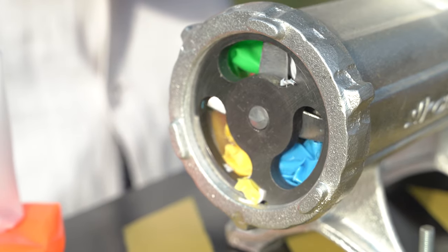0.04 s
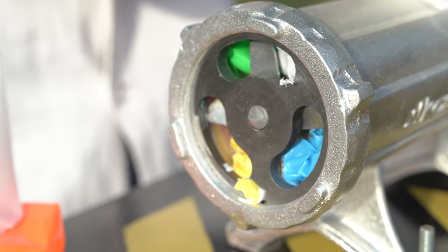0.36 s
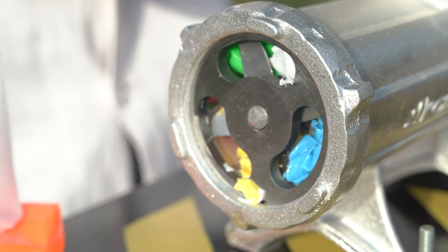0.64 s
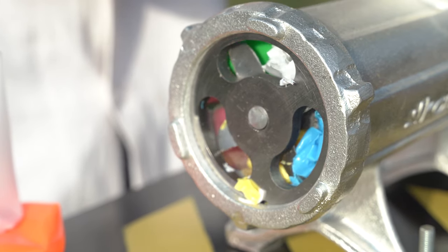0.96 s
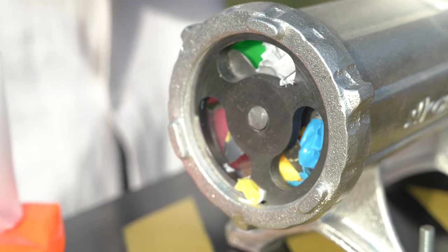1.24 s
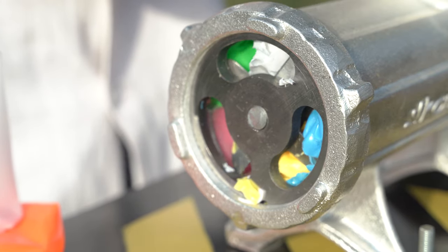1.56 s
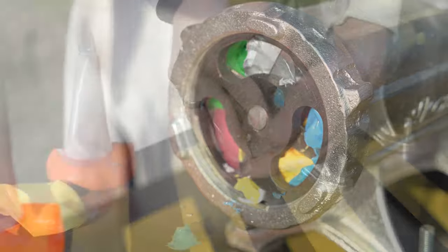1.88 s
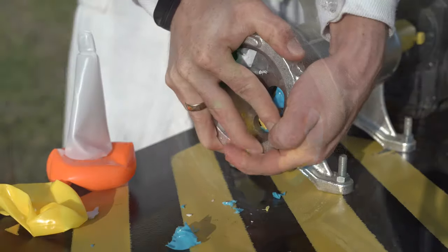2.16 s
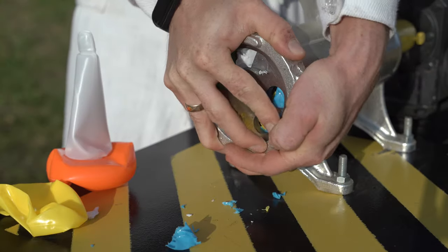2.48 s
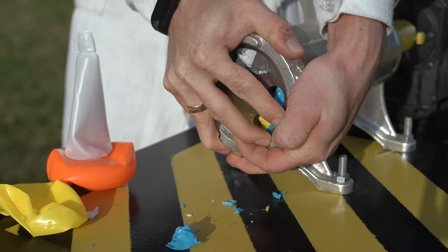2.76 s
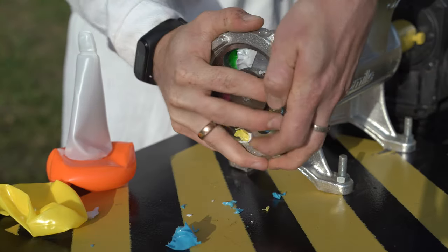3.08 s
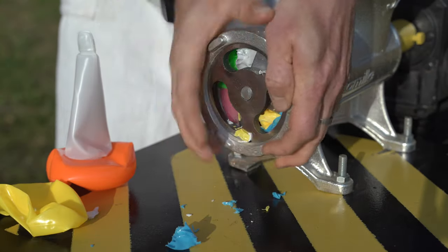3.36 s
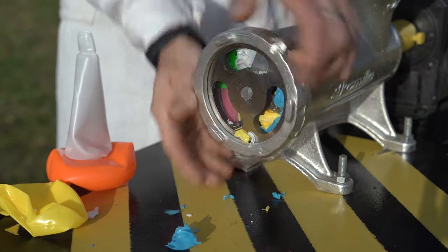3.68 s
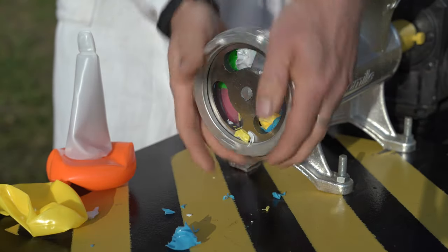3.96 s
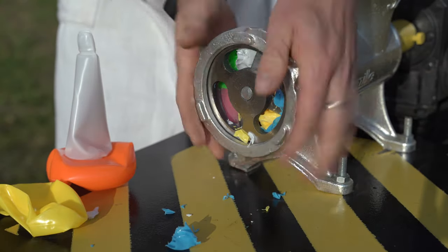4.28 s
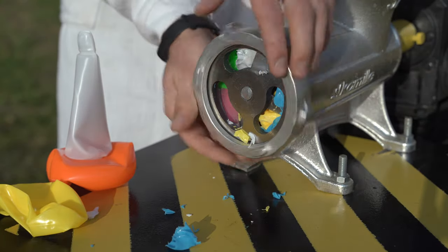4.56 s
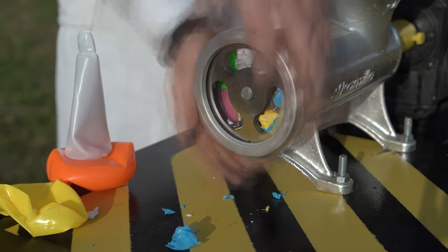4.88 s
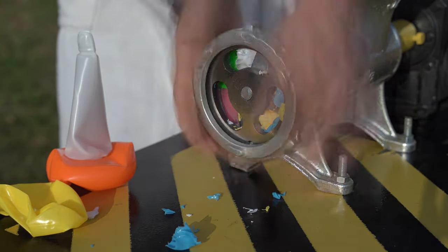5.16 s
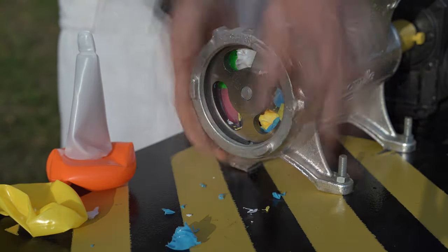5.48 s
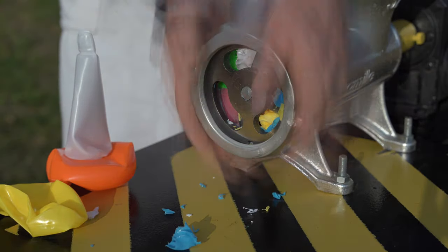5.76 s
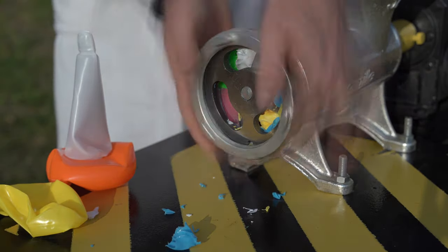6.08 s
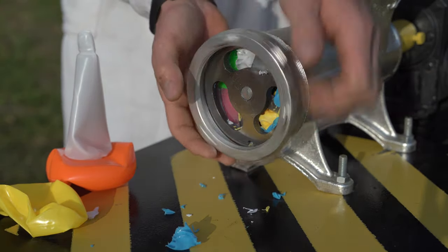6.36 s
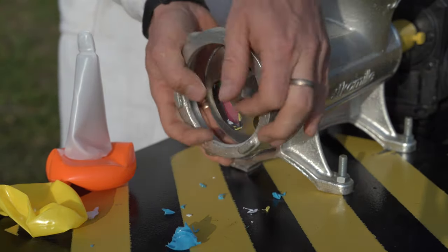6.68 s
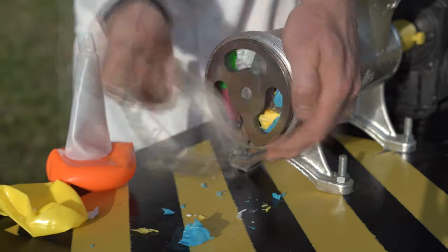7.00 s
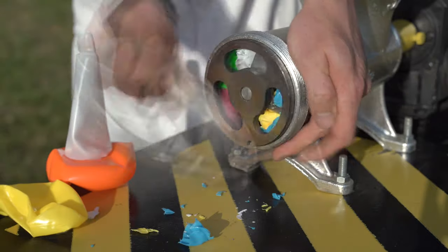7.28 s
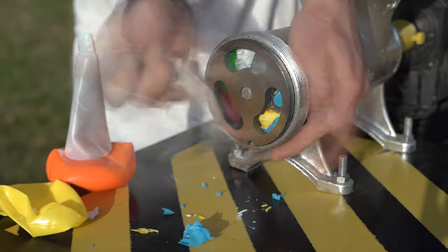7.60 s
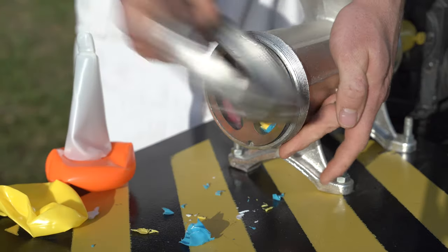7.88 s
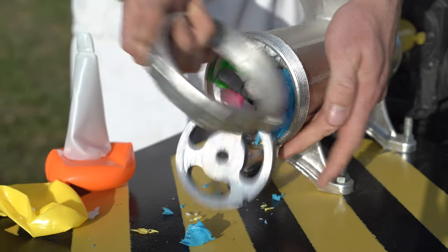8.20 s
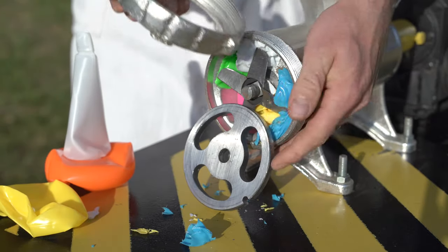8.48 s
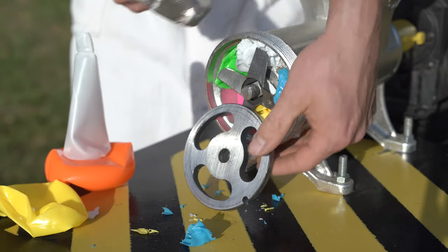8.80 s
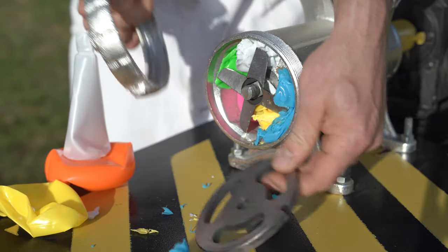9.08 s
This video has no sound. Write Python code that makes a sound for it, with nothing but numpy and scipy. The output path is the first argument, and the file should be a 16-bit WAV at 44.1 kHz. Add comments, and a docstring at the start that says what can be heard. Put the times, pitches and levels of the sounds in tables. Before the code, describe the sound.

A motorized grinder chews plastic and winds down; a threaded metal ring scrapes and rattles loose before a steel disc drops, ringing.

```python
"""An electric meat grinder chews plastic toys, outdoors on a steel table: gear teeth rattle the housing,
the auger scrapes, plastic snaps, and the drive fades out. Hands unscrew the cast retaining ring, which
rubs and rattles in its thread and knocks on the barrel. The steel cutting plate springs free, bounces
and rings on the table, and is picked up among plastic crumbs. Gusts rumble at the microphone."""
import sys
import numpy as np
from scipy import signal
from scipy.fft import rfft, irfft, next_fast_len
from scipy.io import wavfile
from scipy.ndimage import uniform_filter1d

SR = 44100
rng = np.random.default_rng(int(sys.argv[2]) if len(sys.argv) > 2 else 0)


def output_pcm(signal):
    """Save a mono or channel-first signal as 16-bit PCM at the path in sys.argv[1].

    Samples are clipped to [-1, 1] before scaling.
    """
    pcm = np.clip(np.atleast_2d(signal).T, -1, 1) * 32767
    wavfile.write(sys.argv[1], SR, np.round(pcm).astype(np.int16))


N = 407484
TIME = np.arange(N) / SR
AGE = np.arange(int(.8 * SR)) / SR  # s since an event began
SHAFT_HZ, MESH_HZ = 17.3, 80.8


# drive envelope: time_s, level_db
DRIVE_LEVEL = [(0, -28.5), (1.2, -28), (1.68, -29.5), (1.95, -35.5), (2.15, -48), (2.3, -68), (2.42, -114)]
# gear housing resonances: freq_hz, width_hz, gain_db
GEARBOX_RESONANCES = [(488, 83, 2), (552, 36, -3), (636, 18, -2.5), (698, 21, -5), (869, 17.5, -1),
                      (912, 21, -11), (1089, 51, -1.5), (1126, 30, -3), (1459, 54, -6), (1684, 24, -6.5),
                      (1822, 31, -6.5), (2070, 57, -14.5)]
# casing noise: freq_hz, level_db
CASING_SPECTRUM = [(30, -1.5), (40, -30.5), (55, -8.5), (120, -7.5), (170, -16), (255, -27), (340, -12.5),
                   (600, -10.5), (770, -11.5), (1000, -6), (1200, -6.5), (1350, -19), (1900, -18.5),
                   (2400, -32), (3500, -38.5)]

def grinder():
    """Gear teeth rattle housing and casing, pulsing with shaft and mesh; auger and motor join in."""
    clock = TIME + np.cumsum(.007 * walk(5)) / SR  # speed wander
    shaft = np.cos(2 * np.pi * SHAFT_HZ * clock)
    mesh = np.cos(2 * np.pi * MESH_HZ * clock)
    load = undb(.9 * shaft + 3.4 * mesh + .6 * walk(25))
    teeth = shaft_impacts(clock, spread_db=2.4, repeat=.45) * load
    housing = undb(-8) * sing(teeth, GEARBOX_RESONANCES)
    casing = undb(-6.5) * colour(grains(1.67) * load, CASING_SPECTRUM)
    drive = curve(DRIVE_LEVEL)
    running = drive / drive.max()
    scraping = undb(-27.5) * auger(clock, shaft) * running ** .68  # fades ahead of the gears
    return drive * (housing + casing + scraping) + undb(-3) * motor_hum() * running + gear_whine()


# auger scrape: freq_hz, level_db
AUGER_SPECTRUM = [(1410, -27), (2400, -16.5), (3370, -7), (5060, -8), (5480, -16), (5950, -16.5),
                  (9820, -23), (14000, -51)]
# barrel resonances: freq_hz, width_hz, gain_db
BARREL_RESONANCES = [(2490, 49, 2), (2655, 68, -2), (3265, 120, -1.5), (3520, 42, 3.5), (3967, 180, -4),
                     (4520, 57, -9), (5150, 70, -12)]

def auger(clock, shaft):
    """The auger scrapes the barrel and excites its narrow modes, biting harder once a turn."""
    scrape = shaft_impacts(clock, spread_db=3.2, repeat=.35) * undb(1.3 * walk(9))
    modes = unit(signal.oaconvolve(scrape, clink(AUGER_SPECTRUM, t60=.06, count=90))[:N])
    hiss = colour(scrape, AUGER_SPECTRUM)
    barrel = sing(scrape, BARREL_RESONANCES)
    bite = undb(2.7 * shaft + 1.8 * walk(200))
    return (undb(-5) * modes + undb(-8.5) * hiss + undb(-2.5) * barrel) * bite


# motor and gear lines: pitch_hz, level_db
HUM_LINES = [(100, -43), (200, -50.5), (300, -54.5), (885, -40)]

def motor_hum():
    """Motor and gear tones, each wavering in level and phase."""
    return sum(undb(db + 3.6 * walk(3.9)) * np.sin(2 * np.pi * hz * (TIME + .0001 * walk(6.7)))
               for hz, db in HUM_LINES)


# gear whine: time_s, pitch_hz, level_db
WHINE_TRACK = [(0, 492, -63.5), (.8, 497, -34), (1.35, 498.7, -46), (1.55, 481, -29), (1.75, 436.6, -39.5),
               (2.05, 455, -46), (2.28, 450, -58.5), (2.42, 457, -86)]

def gear_whine():
    """A rough gear tone that sags as the load grows."""
    times, hz, _ = np.transpose(WHINE_TRACK)
    pitch_hz = np.interp(TIME, times, hz) * (1 + .026 * walk(70))
    level = curve(WHINE_TRACK, column=2) * undb(3.5 * walk(55))
    return level * np.sin(2 * np.pi * np.cumsum(pitch_hz) / SR)


# plastic snaps: start_s, level_db, centre_hz
PLASTIC_SNAPS = [(.763, -13, 2750), (1.125, -24.5, 6600), (1.744, -25, 2400), (2.197, -49, 10500),
                 (8.047, -22, 2780), (8.167, -27, 3000), (9.054, -40, 7140), (9.066, -30.5, 4660),
                 (9.098, -43, 6800), (9.124, -38, 7600)]
# one snap: centre_ratio, level_db
SNAP_SPECTRUM = [(.6, -12), (.92, 1), (1.45, -5), (2, -21), (4, -21)]

def plastic():
    """Brittle plastic snaps in the barrel and under the plate, each time one brief, broad resonance."""
    out = np.zeros(N)
    for start_s, db, centre_hz in PLASTIC_SNAPS:
        spectrum = [(centre_hz * ratio, band_db) for ratio, band_db in SNAP_SPECTRUM]
        add(out, start_s, undb(db) * burst(spectrum, t60=.0078, rise_s=.00084))
    return out


# ring on barrel: start_s, level_db, hardness_db, ringing_db, choke_after_s
RING_KNOCKS = [(3.41, -36.5, 8, -22, 0.0014), (3.617, -41, 0.5, -46, 0.0044),
               (3.725, -36, -12.5, -36, 0.036), (3.815, -55.5, -38.5, -63, .02),
               (3.971, -35.5, 12, -43.5, 0.003), (3.985, -39.5, -27.5, -51.5, 0.033),
               (4.027, -39, -15, -55.5, .02), (4.115, -32, -1, -47, 0.04),
               (4.393, -35.5, 10.5, -48.5, 0.0024), (4.766, -36.5, -8, -56, .012),
               (5.89, -38.5, -4, -35, 0.0035), (6.198, -36.5, 10.5, -49, 0.011),
               (6.221, -32.5, -20, -35, 0.011), (6.323, -35.5, -27, -31, 0.0092),
               (6.389, -35.5, 0.5, -31.5, 0.033), (6.474, -18, -11, -12.5, 0.044),
               (6.535, -37.5, 19.5, -43.5, 0.0072), (6.602, -20, -2.5, -23, 0.0035),
               (6.617, -27.5, 3.5, -45, 0.016), (6.67, -27.5, -5, -29.5, 0.0102),
               (7.714, -15, -2.5, -29.5, 0.018), (7.743, -24.5, 0, -51.5, 0.0073)]
# retaining ring modes: freq_hz, level_db, t60_s
RING_MODES = [(1288, -12.5, 0.13), (1950, -22.5, 0.05), (2202, -21, .18), (3400, -8, .15), (3544, -2, 0.25),
              (5950, -19, 0.11), (7063, -25.5, 0.2), (9140, -23, .06), (11500, -22, .06)]
# low body of a blow: freq_hz, level_db
THUD_SPECTRUM = [(90, -6.5), (155, 3), (250, -12), (340, 4), (480, 7), (750, 3), (1100, -6), (1500, -6.5)]

def ring_knocks():
    """The ring hits the barrel: harder contact, more tick, less thud. The hand chokes the ringing."""
    out = np.zeros(N)
    for start_s, db, hard_db, ringing_db, choke_after_s in RING_KNOCKS:
        add(out, start_s, undb(db + hard_db - 5) * tick(t60=.037, tail_db=-2))
        add(out, start_s, undb(db) * clack(t60=.04, rise_s=.00054, clink_t60=.042))
        add(out, start_s, undb(db - .51 * hard_db - 3) * burst(THUD_SPECTRUM, t60=.11, rise_s=.00083))
        choke = hold(choke_after_s, release_s=.007)
        add(out, start_s, undb(ringing_db - 4) * strike(RING_MODES, scatter_db=3) * choke)
    return out


TAP_GAP_S = .017
# flicks that spin the ring: start_s, first_tap_db, second_tap_db
RING_FLICKS = [(4.809, -35, -48), (4.91, -37, -50), (5.017, -41, -39), (5.125, -39, -29), (5.363, -30, -49),
               (5.468, -31, -32), (5.662, -30.5, -37), (5.748, -34, -36.5), (5.823, -39, -34),
               (5.904, -54, -34.5), (5.992, -48.5, -40.5), (6.072, -40.5, -28), (6.168, -30, -42.5),
               (6.929, -39, -28), (6.9786, -25.5, -28.5), (7.019, -22, -23.5), (7.0612, -24.5, -22.5),
               (7.115, -28.5, -18.5), (7.165, -22.5, -20.5), (7.21, -23.5, -18.5), (7.2623, -25.5, -20.5),
               (7.318, -16.5, -27.5), (7.357, -24.5, -20.5), (7.403, -35, -16.5), (7.4493, -24, -20),
               (7.501, -18, -27), (7.545, -18, -28.5), (7.588, -18.5, -26), (7.637, -16.5, -30),
               (7.677, -49, -15), (7.788, -25.5, -29.5)]

def ring_rattles():
    """Each flick makes the ring tap twice in the play of its thread; the table drones along."""
    out = np.zeros(N)
    for start_s, first_db, second_db in RING_FLICKS:
        for tap_s, db in ((start_s, first_db), (start_s + TAP_GAP_S, second_db)):
            body_db = tap_body_db(db)
            add(out, tap_s, undb(db - 8) * tick(t60=.014, tail_db=0))
            add(out, tap_s, undb(body_db - 8.5) * clack(t60=.013, rise_s=.00042, clink_t60=.031))
            add(out, tap_s, undb(body_db - 10) * burst(THUD_SPECTRUM, t60=.055, rise_s=.0095))
            add(out, tap_s, undb(body_db - 21) * strike(TABLE_MODES, scatter_db=2))
    return out


def tap_body_db(tap_db, firm_db=-15):
    """Light taps only tick; firm ones move the whole casting."""
    return firm_db + 1.38 * (tap_db - firm_db)


# ring turns, last the plate sliding off its pin: start_s, length_s, rub_db, swell_db, grit_db, sing_db
STROKES = [(2.919, 0.14, -46, 1.5, -50, -55.5), (3.435, 0.33, -41.5, 15, -53, -57.5),
           (4.003, 0.23, -43.5, -11, -52.5, -66), (4.111, 0.076, -39.5, -33, -55, -46),
           (4.378, 0.3, -43.5, 3, -52, -56.5), (4.582, 0.16, -51, 11, -68, -79),
           (4.964, 0.027, -40.5, 20, -41.5, -46.5), (5.235, 0.075, -40, 2, -49, -48.5),
           (5.57, 0.069, -43.5, 6, -56, -58), (5.845, 0.036, -54, 4, -72, -74),
           (6.111, 0.048, -39.5, -3, -36.5, -51), (6.197, 0.25, -33.5, 10.5, -54.5, -57.5),
           (6.318, 0.22, -55.5, -0.5, -48, -47), (6.546, 0.091, -22, -9.5, -35.5, -35.5),
           (6.622, 0.039, -48.5, -3, -56.5, -72), (6.747, 0.052, -44.5, 7, -71, -66),
           (7.056, 0.8, -54.5, 10.5, -75, -55.5), (7.966, 0.14, -43.5, -31.5, -44.5, -61.5)]
# thread rub: freq_hz, level_db
RUB_SPECTRUM = [(100, -5.5), (155, 15.5), (200, -13), (250, -16), (340, 11), (560, 4), (790, -3.5),
                (900, -0.5), (1300, -10.5), (1900, -13.5), (2600, -18), (3000, -28)]
# thread grit: freq_hz, level_db
GRIT_SPECTRUM = [(2000, -10), (3000, 0.5), (3500, 6.5), (4100, 3), (4700, -6), (5600, -12.5), (6200, -2.5),
                 (7600, -15), (9300, -8.5), (12000, -19), (16000, -23.5)]
# rubbed ring resonances: freq_hz, width_hz, gain_db
RUB_RESONANCES = [(1264, 38, -2.5), (1650, 190, -8.5), (2210, 24, -4), (2490, 90, -9), (3590, 96, -9),
                  (4030, 98, -10)]

def thread_friction():
    """Metal grinds on metal in strokes; a flick lifts the ring, drags it and may let it slide on."""
    rub_env, grit_env, sing_env, spin_env = np.zeros((4, N))
    contact = np.ones(N)
    delay_s, max_slide_s, lift_s = .016, .051, .022
    flicks_s = [row[0] for row in RING_FLICKS]
    slides = [(start_s + delay_s, min(gap_s - delay_s, max_slide_s), -42, 0, -58, -56)  # as STROKES
              for start_s, gap_s in zip(flicks_s, np.diff(flicks_s)) if gap_s > .06]
    for start_s, length_s, rub_db, swell_db, grit_db, sing_db in STROKES + slides:
        swell, arch = stroke(length_s, swell_db)
        add(rub_env, start_s, undb(rub_db) * swell)
        add(grit_env, start_s, undb(grit_db) * arch)
        add(sing_env, start_s, undb(sing_db) * swell)
    for start_s, length_s, *_ in slides:
        add(spin_env, start_s, undb(-65) * stroke(length_s, swell_db=0)[0])
    drag = hold(TAP_GAP_S, release_s=.0045)
    for start_s, first_db, second_db in RING_FLICKS:
        db = tap_body_db((first_db + second_db) / 2)
        add(rub_env, start_s, undb(db - 6.5) * drag)
        add(grit_env, start_s, undb(db - 16) * drag)
        contact[int((start_s - lift_s) * SR):int(start_s * SR)] = undb(-2.5)
    pressure = uniform_filter1d(contact, size=200) * undb(2 * walk(80))
    body = moving_contact(grains(4.5), t60=.09)
    grit = moving_contact(grains(5.2), t60=.06)
    rub = undb(-1.5) * colour(body * pressure, RUB_SPECTRUM) * rub_env
    scratch = undb(-2) * colour(grit * pressure, GRIT_SPECTRUM) * grit_env
    singing = sing(grit * pressure, RUB_RESONANCES) * sing_env
    free_spin = sing(grit, [(6400, 380, 0)]) * spin_env
    return rub + scratch + singing + free_spin


def stroke(length_s, swell_db):
    """Rub and grit envelopes of one slide; both follow the speed, which peaks in mid-stroke."""
    done = np.minimum(AGE / length_s, 1)
    after = np.maximum(AGE / length_s - 1, 0)
    speed = np.abs(np.sin(np.pi * done))
    gate = (1 - np.exp(-done / .1)) * np.exp(-after / .12)
    return gate * undb(swell_db * (done - .5) - 5 * (1.5 - speed)), speed ** 1.6


def moving_contact(x, t60, shift_s=.11):
    """As the contact point travels, one set of crowded cast-metal modes fades into the next."""
    modes, hop = np.zeros(N), int(shift_s * SR)
    fade = np.sqrt(np.hanning(2 * hop))
    age = AGE[:len(AGE) // 8]
    for start in range(int(STROKES[0][0] * SR) - hop, int(STROKES[-1][0] * SR) + hop, hop):
        response = unit(rng.standard_normal(len(age)) * decay(age, t60))
        add(modes, start / SR, fade * signal.fftconvolve(x[start:start + 2 * hop], response)[:2 * hop])
    return unit(x) + 2.2 * colour(modes, [(300, -20), (1400, 0), (16000, 0)])  # hands damp the lows


# ring, barrel and rattling plate resonances (3277 Hz is the plate's bending): freq_hz, width_hz, gain_db
RATTLE_RESONANCES = [(1180, 27, 11), (1665, 120, 2.5), (3277, 57, 5), (5880, 54, 7.5), (6050, 60, 12),
                     (8910, 150, 12), (10360, 60, 4.5)]

def metal_colour(x, depth_db):
    """Narrow resonances of the ring, the barrel and the rattling plate colour a sound; rms unchanged."""
    resonant = sum(undb(db) * resonate(x, hz, width_hz) for hz, width_hz, db in RATTLE_RESONANCES)
    return unit(x + undb(depth_db) * resonant) * np.sqrt(np.mean(x ** 2))


# plate falls, settles, is picked up: start_s, level_db, hardness_db, table_db, bend_db, rim_db, foot_db
PLATE_CONTACTS = [(8.122, -22.5, -8, -11.5, -40.5, -45, -28), (8.244, -15.5, -5, -42, -48, -57, -18.5),
                  (8.28, -20.5, -12, -16, -58, -57, -47), (8.312, -22, -4.5, -23, -17.5, -44, -46),
                  (8.354, -21.5, -10, -19.5, -37, -42, -42), (8.396, -31, -8, -28.5, -44, -52, -55),
                  (8.467, -44.5, -26.5, -57, -67.5, -83, -68), (8.517, -24.5, -27, -56, -64, -67, -28.5),
                  (8.984, -46.5, -30, -49, -39, -83, -49), (9.01, -41, -32, -65, -55, -74, -48.5),
                  (9.123, -53, -20, -49, -64.5, -74, -79)]
# plate bending modes: freq_hz, level_db, t60_s
BENDING_MODES = [(3275, -3.5, 0.99), (3370, -4, 0.28), (4220, -1, 0.44), (4900, -29.5, 0.7),
                 (7255, -5.5, 0.34), (10400, -28.5, 0.2), (15570, -32.5, .25)]
# plate rim modes: freq_hz, level_db, t60_s
RIM_MODES = [(8710, 1, 0.38), (8850, 4.5, 0.43), (9249, -16, .45), (9895, -19, .3), (10190, -12, 0.35),
             (12750, -6, .42), (13150, -3, .5), (14200, -17, .35)]
# steel table modes: freq_hz, level_db, t60_s
TABLE_MODES = [(108.5, -4, 0.15), (148.5, 0, 0.29), (263, 2, 0.061), (331, 4, 0.12), (510, 0.5, 0.067),
               (652, -13, 0.17), (814, -14.5, 0.072), (984, -20.5, 0.072)]
# modes of the grinder's cast foot: freq_hz, level_db, t60_s
FOOT_MODES = [(576, -1.5, 0.18), (1040, -15, 0.33), (1136, 2.5, 0.074), (1603, -5.5, .086),
              (2030, -3.5, 0.098), (3300, -8.5, 0.07), (6150, -12, 0.032)]

def cutting_plate():
    """The disc pops free and sings; each landing cracks, booms in the table, damps and restrikes it."""
    out, bending, rim = np.zeros((3, N))
    pop_s, rest_s, full_landing_db, tilt_db_per_octave = 7.972, 8.467, -10.5, -22
    high_modes = [mode for mode in RING_MODES if mode[0] > 3000]  # short contact reaches only these
    # the pop bends the rim more slowly than a landing does
    dull_rim = [(hz, db + tilt_db_per_octave * np.log2(hz / RIM_MODES[0][0]), t60)
                for hz, db, t60 in RIM_MODES]
    add(out, pop_s, crack(db=-8.5, hard_db=2))
    add(out, pop_s, undb(-2.5) * strike(high_modes) * np.exp(-AGE / .0066))
    add(bending, pop_s, undb(-33.5) * strike(BENDING_MODES))
    add(rim, pop_s, undb(-25) * strike(dull_rim))
    for start_s, db, hard_db, table_db, bend_db, rim_db, foot_db in PLATE_CONTACTS:
        add(out, start_s, crack(db, hard_db))
        add(out, start_s, undb(table_db) * strike(TABLE_MODES))
        add(out, start_s, undb(foot_db) * strike(FOOT_MODES))
        flex = undb(bend_db - 5.5) * strike(BENDING_MODES)
        shimmer = undb(rim_db) * strike(RIM_MODES)
        if start_s < rest_s:
            force = min(undb(db - full_landing_db), 1)
            bending *= damp(start_s, db=-16 * force)
            rim *= damp(start_s, db=-16.5 * force)
            add(bending, start_s, flex)
            add(rim, start_s, shimmer)
        else:  # leaning on the barrel or held: rings only briefly
            add(out, start_s, (flex + shimmer) * np.exp(-AGE / .054))
    rocking = undb(3 * walk(45))  # the face turns to and from the microphone
    return out + (bending * damp(rest_s, db=-48) + rim) * rocking


def crack(db, hard_db):
    """One plate contact: tick, clack and, when it lands flat and soft, a thud."""
    return (undb(db + hard_db - .5) * tick(t60=.035, tail_db=-5)
            + undb(db - 3.5) * clack(t60=.038, rise_s=.00019, clink_t60=.042, clink_db=-2.5)
            + undb(db + 9.5 - 2 * max(hard_db + 8, 0)) * burst(THUD_SPECTRUM, t60=.075, rise_s=.0018))


# midrange of a blow: freq_hz, level_db
CLACK_SPECTRUM = [(800, -16), (1150, 2), (1600, -0.5), (2000, 5.5), (2950, 2.5), (3300, 1.5), (3700, 10),
                  (4350, 2.5), (4900, -29), (5600, -40.5)]

def clack(t60, rise_s, clink_t60, clink_db=0):
    """Struck metal: a dense midrange burst and a few distinct modes."""
    return burst(CLACK_SPECTRUM, t60, rise_s) + undb(clink_db) * clink(CLACK_SPECTRUM, clink_t60)


# treble of a blow: freq_hz, level_db
TICK_SPECTRUM = [(4300, 7.5), (5400, 1.5), (6100, 9.5), (6900, 2), (8900, -3.5), (11800, 1.5),
                 (16000, -13.5)]

def tick(t60, tail_db):
    """Steel on steel: a very short spike, then brief high modes."""
    spike = burst(TICK_SPECTRUM, t60=.0046, rise_s=.00021)
    tail = clink(TICK_SPECTRUM, t60) + undb(-3.5) * burst(TICK_SPECTRUM, t60, rise_s=.0005)
    return spike + undb(tail_db) * tail


def reflections(x, wet_db, t60):
    """Adds weak, dull scatter from the machine and things nearby."""
    spectrum = [(120, 12), (1200, -7), (4000, -.5), (15000, -14)]
    tail = colour(rng.standard_normal(len(AGE)), spectrum) * decay(AGE, t60)
    return x + undb(wet_db) * signal.fftconvolve(x, tail / np.sqrt(np.sum(tail ** 2)))[:N]


# gust envelope: time_s, level_db
GUST_LEVEL = [(0.0, -41.5), (1.75, -46.5), (2.83, -63), (2.96, -41), (3.27, -64), (3.45, -55),
              (4.92, -50.5), (5.22, -32.5), (5.6, -45), (5.94, -52.5), (6.6, -37), (6.85, -33),
              (7.05, -36.5), (7.5, -38), (8.36, -35), (8.67, -50), (9.24, -48.5)]
# wind rumble: freq_hz, level_db
RUMBLE_SPECTRUM = [(15, -10), (28, -0.5), (42, 3.5), (62, -8), (90, -17.5), (150, -26.5), (300, -56)]
# flutter on the microphone: freq_hz, level_db
BUFFET_SPECTRUM = [(50, 23), (80, 8), (130, -15), (220, -23), (330, 4), (420, -4)]
# outdoor air: freq_hz, level_db
AIR_SPECTRUM = [(150, -7.5), (350, -14), (1200, -21), (4400, -25.5), (7000, -34), (16000, -41.5)]

def wind():
    """Gusts rumble over faint, even air; one flutters right on the microphone."""
    buffet_s, buffet_length_s = 5.08, .42
    rumble = undb(-1.5) * colour(rng.standard_normal(N), RUMBLE_SPECTRUM) * curve(GUST_LEVEL)
    air = undb(-72) * colour(rng.standard_normal(N), AIR_SPECTRUM)
    gust = np.sin(np.pi * np.clip((TIME - buffet_s) / buffet_length_s, 0, 1))
    flutter = undb(-44.5 + 3.7 * walk(45)) * colour(rng.standard_normal(N), BUFFET_SPECTRUM)
    return rumble + air + gust * flutter


def grains(spread_db):
    """Dense micro-impacts of very unequal size."""
    return rng.standard_normal(N) * undb(spread_db * np.minimum(rng.exponential(size=N), 7))


def shaft_impacts(clock, spread_db, repeat):
    """Micro-impacts; the share `repeat` of their power recurs on every shaft turn."""
    place = (clock * SHAFT_HZ % 1) * SR / SHAFT_HZ
    recurring = unit(grains(spread_db)[place.astype(int)])
    return np.sqrt(repeat) * recurring + np.sqrt(1 - repeat) * unit(grains(spread_db))


def burst(spectrum, t60, rise_s):
    """A crowd of short-lived modes, as noise that builds up and dies away."""
    age = AGE[:len(AGE) // 4]
    return colour(rng.standard_normal(len(age)), spectrum) * (1 - np.exp(-age / rise_s)) * decay(age, t60)


def strike(modes, scatter_db=1):
    """Decaying modes; each blow lands elsewhere and weights them anew."""
    out = np.zeros(len(AGE))
    for hz, db, t60 in modes:
        age = AGE[:int(t60 * SR)]
        gain = rng.choice([-1, 1]) * undb(db + scatter_db * rng.standard_normal())
        add(out, 0, gain * np.sin(2 * np.pi * hz * age) * decay(age, t60))
    return out


def clink(spectrum, t60, count=7):
    """The brief modes that one contact point favours."""
    hz, db = np.transpose(spectrum)
    modes = [(pick_hz, np.interp(pick_hz, hz, db), t60) for pick_hz in rng.uniform(hz[0], hz[-1], count)]
    return strike(modes, scatter_db=2)[:len(AGE) // 4] / np.sqrt(count)


def sing(x, resonances):
    """Parallel resonances, each two widened stages in series; rms 1."""
    return unit(sum(undb(db) * resonate(resonate(x, hz, 1.3 * width_hz), hz, 1.3 * width_hz)
                    for hz, width_hz, db in resonances))


def resonate(x, hz, width_hz):
    """One resonance, gain 1 at its centre."""
    return signal.lfilter(*signal.iirpeak(hz, hz / width_hz, fs=SR), x)


def colour(x, spectrum):
    """Filter by (freq_hz, level_db) points with steep skirts; rms 1."""
    hz, db = np.transpose(spectrum)
    size = next_fast_len(len(x))
    bins_hz = np.maximum(np.arange(size // 2 + 1) * SR / size, 1)
    skirts = np.minimum(bins_hz / hz[0], 1) ** 4 * np.minimum(hz[-1] / bins_hz, 1) ** 4
    gain = skirts * undb(np.interp(np.log(bins_hz), np.log(hz), db))
    return unit(irfft(rfft(x, size) * gain, size)[:len(x)])


def curve(rows, column=1):
    """Gain over time from a dB column, silent outside its span."""
    times, db = np.array(rows)[:, [0, column]].T
    return undb(np.interp(TIME, times, db)) * (TIME >= times[0]) * (TIME <= times[-1])


def walk(rate_hz):
    """Random drift through rate_hz new values a second."""
    knots = rng.standard_normal(4096)
    return np.interp(TIME * rate_hz, np.arange(len(knots)), knots)


def damp(start_s, db):
    """Gain that drops quickly from 1 to db and stays there."""
    return np.interp(TIME, [start_s, start_s + .0038], [1, undb(db)])


def hold(length_s, release_s):
    """Gain 1, then an exponential release."""
    return np.exp(-np.maximum(AGE - length_s, 0) / release_s)


def decay(age, t60):
    """Falls 60 dB in t60 seconds."""
    return np.exp(-np.log(1000) * age / t60)


def undb(db):
    """Decibels to gain."""
    return 10 ** (np.asarray(db) / 20)


def unit(x):
    """Scale to rms 1."""
    return x / np.sqrt(np.mean(x ** 2))


def add(out, start_s, sound):
    """Mix a sound in at start_s."""
    start = int(start_s * SR)
    out[start:start + len(sound)] += sound[:N - start]


def scene():
    """All sources, close to one microphone."""
    near = grinder() + thread_friction()
    near += metal_colour(ring_rattles() + ring_knocks(), depth_db=-2.5)
    near += cutting_plate() + plastic()
    return (reflections(near, wet_db=-22.5, t60=.23) + wind())[None]


def record(dry):
    """The recorder rounds the loudest peaks and cuts the top."""
    ceiling, top_hz = .5, 16000
    lowpass = signal.ellip(8, .2, 70, top_hz, fs=SR, output="sos")
    return signal.sosfilt(lowpass, ceiling * np.tanh(dry / ceiling))


dry = scene()
out = record(dry)
output_pcm(out)
```